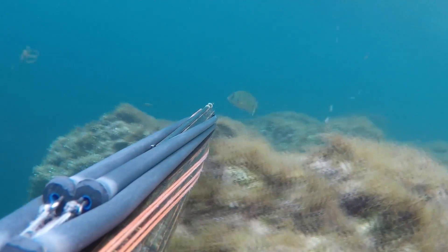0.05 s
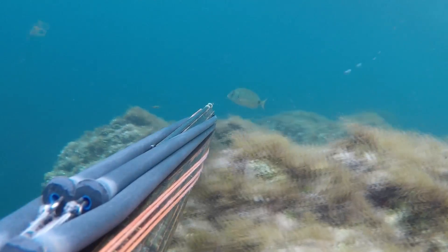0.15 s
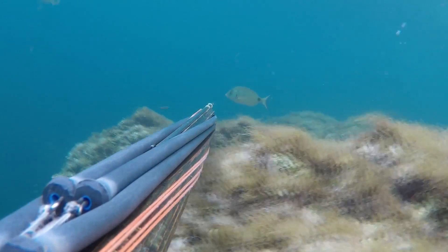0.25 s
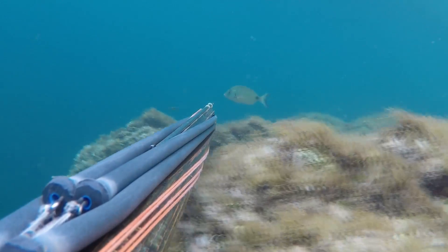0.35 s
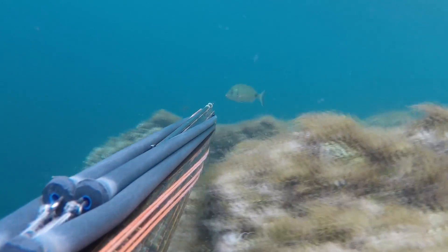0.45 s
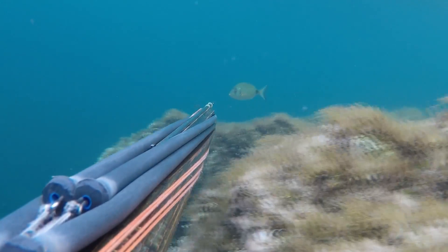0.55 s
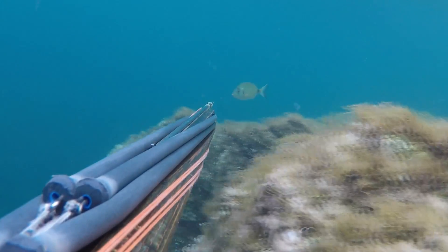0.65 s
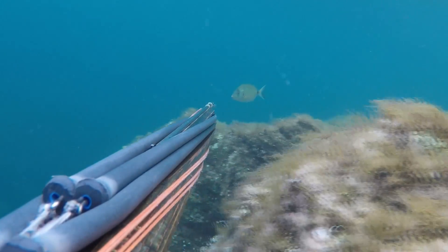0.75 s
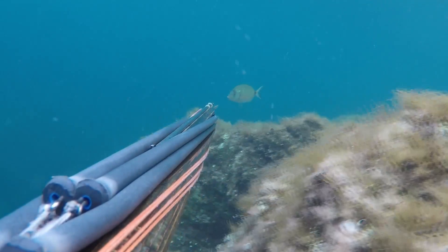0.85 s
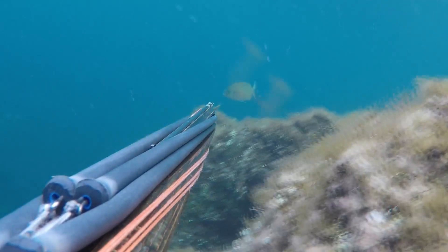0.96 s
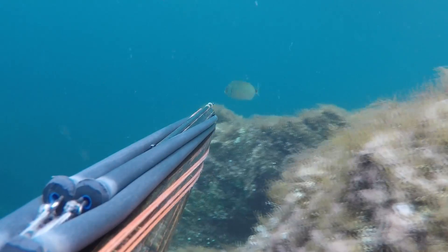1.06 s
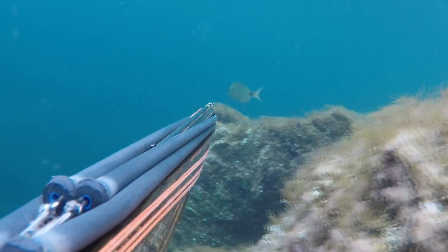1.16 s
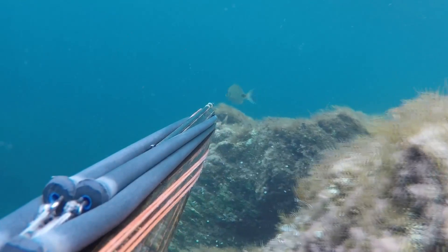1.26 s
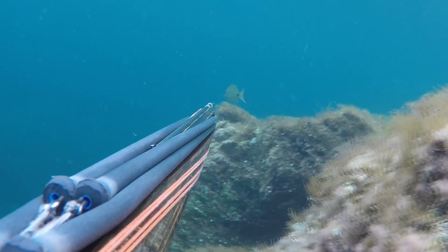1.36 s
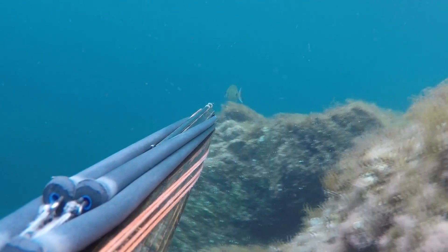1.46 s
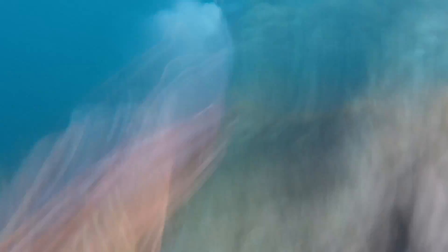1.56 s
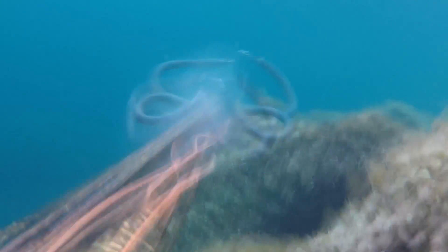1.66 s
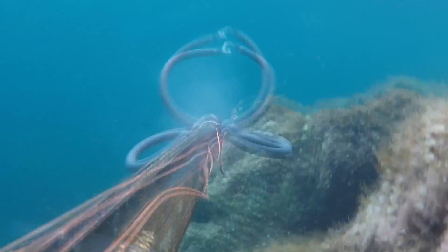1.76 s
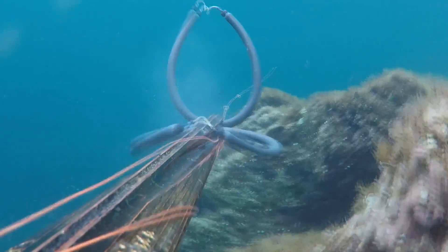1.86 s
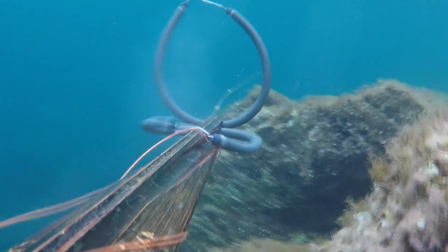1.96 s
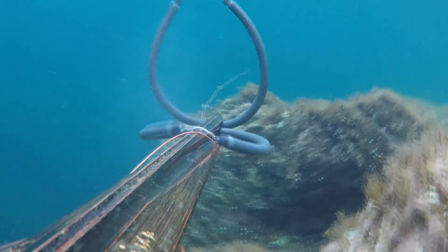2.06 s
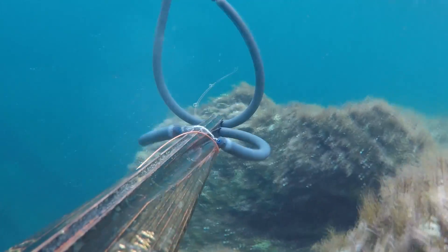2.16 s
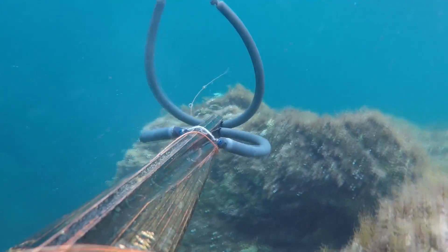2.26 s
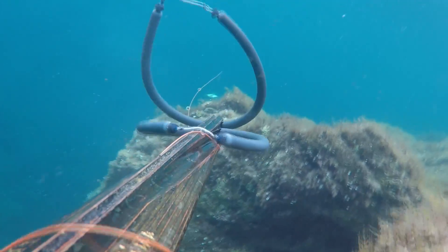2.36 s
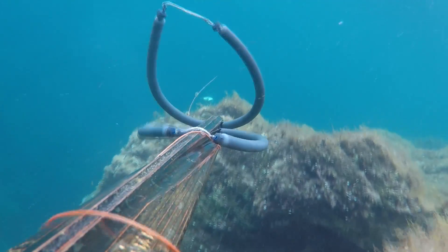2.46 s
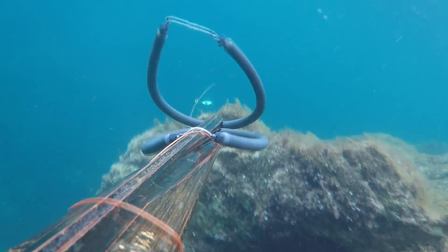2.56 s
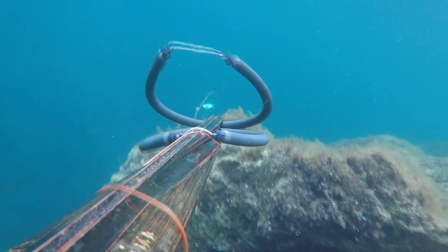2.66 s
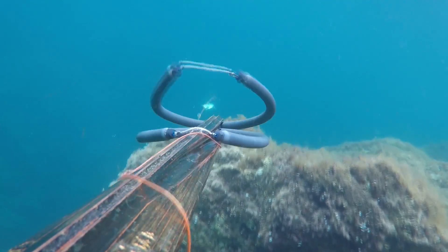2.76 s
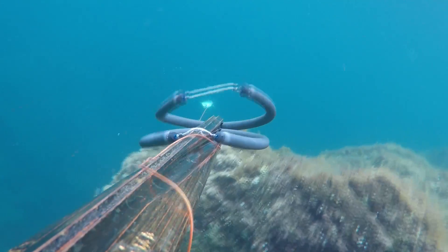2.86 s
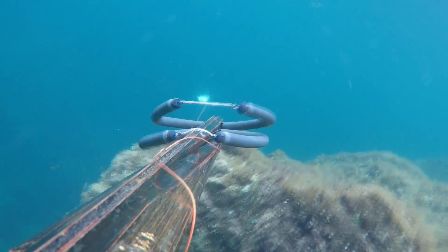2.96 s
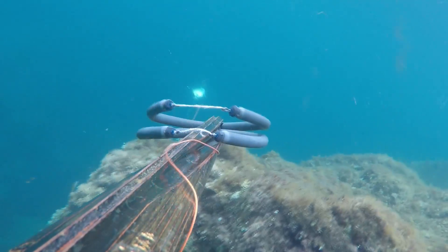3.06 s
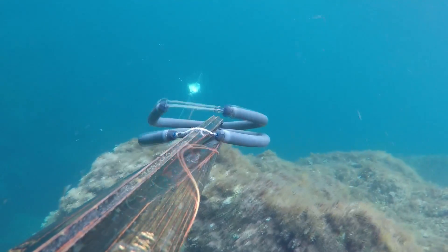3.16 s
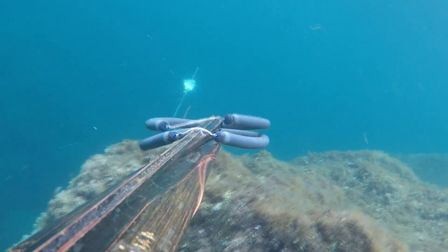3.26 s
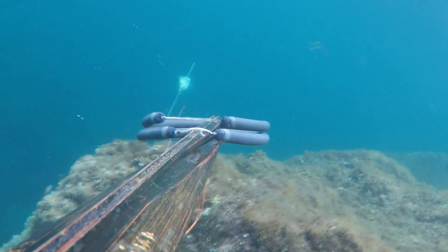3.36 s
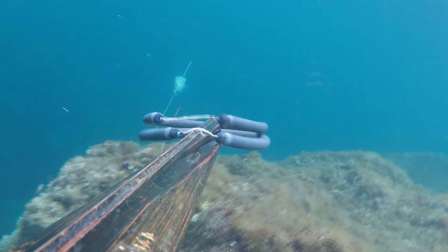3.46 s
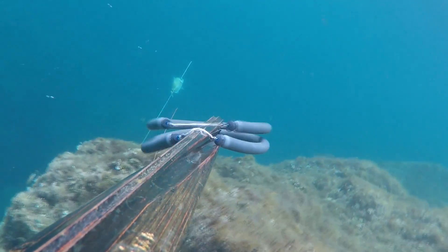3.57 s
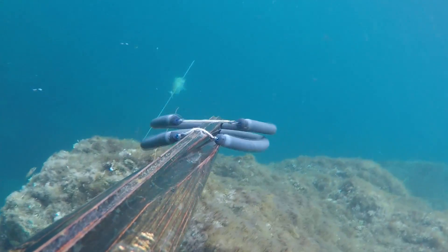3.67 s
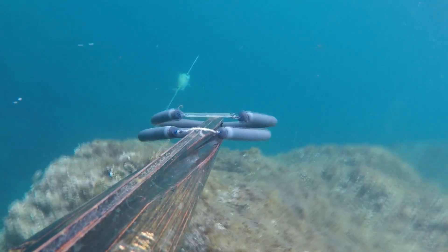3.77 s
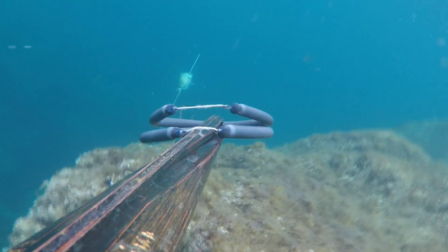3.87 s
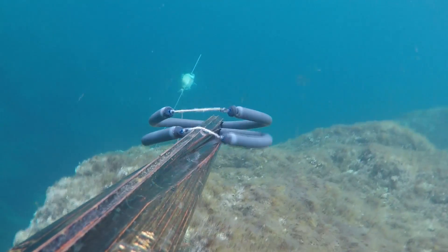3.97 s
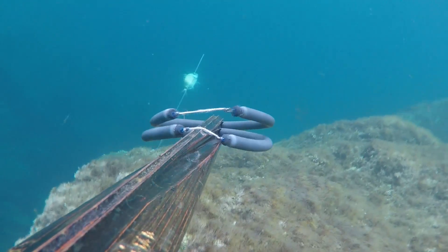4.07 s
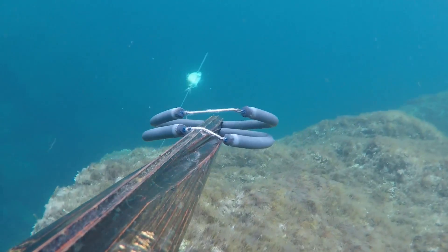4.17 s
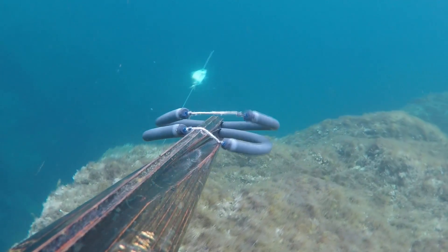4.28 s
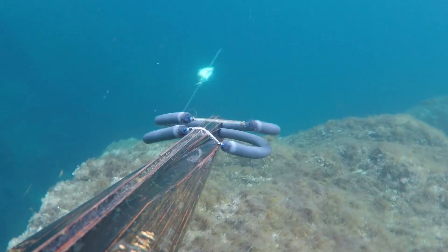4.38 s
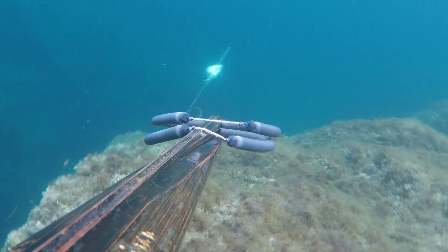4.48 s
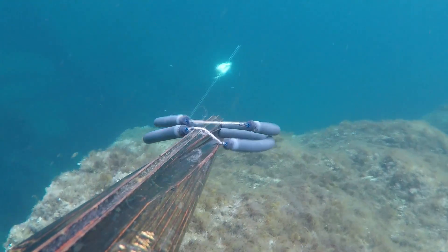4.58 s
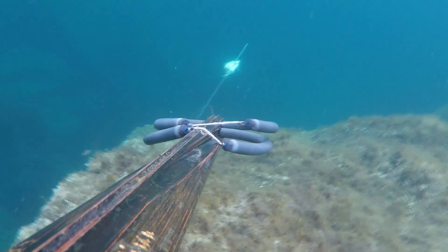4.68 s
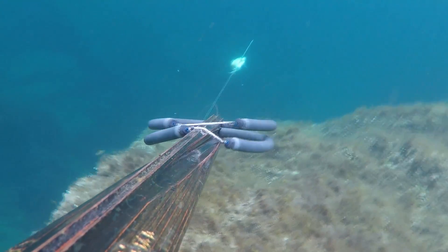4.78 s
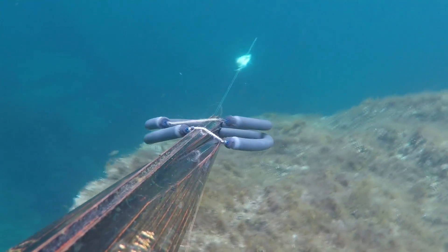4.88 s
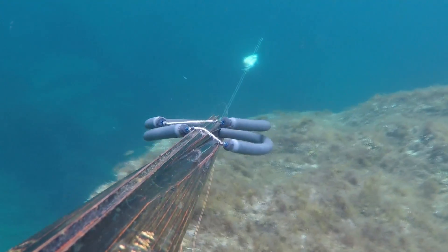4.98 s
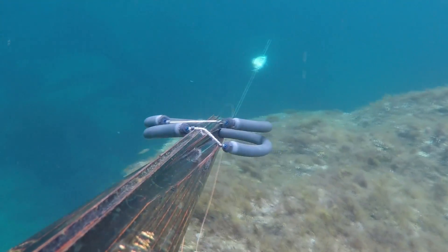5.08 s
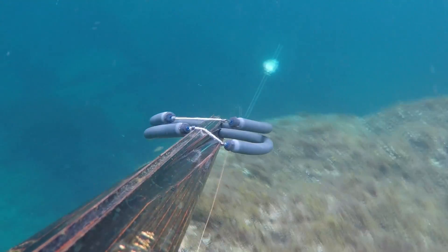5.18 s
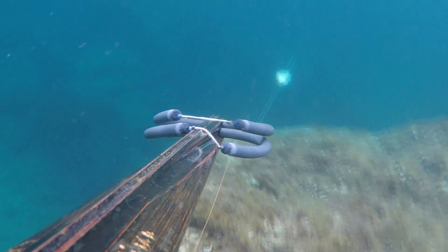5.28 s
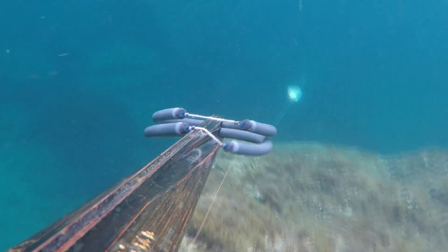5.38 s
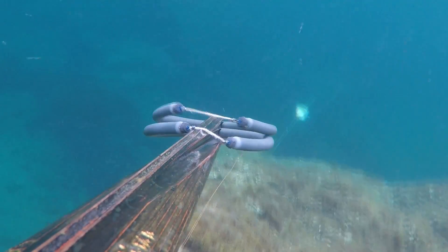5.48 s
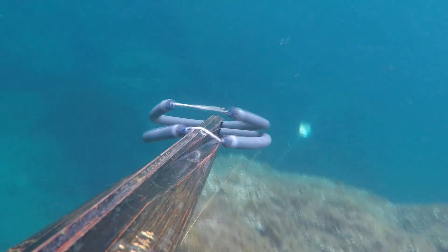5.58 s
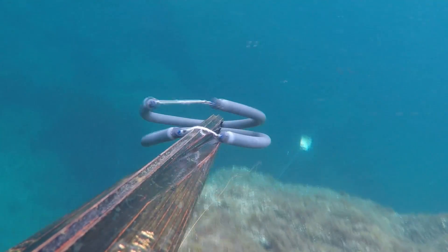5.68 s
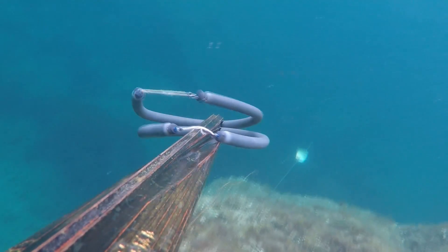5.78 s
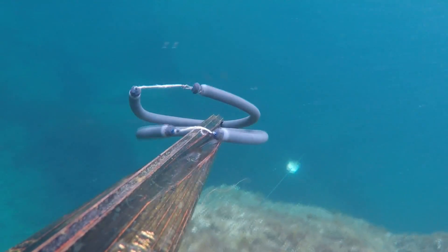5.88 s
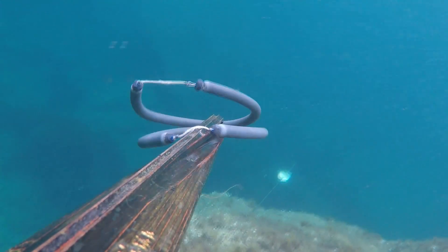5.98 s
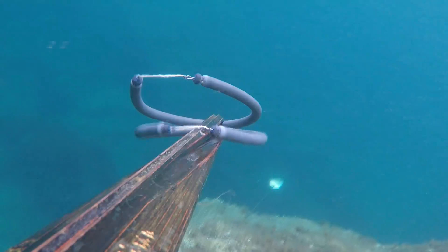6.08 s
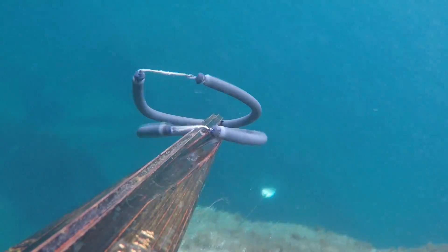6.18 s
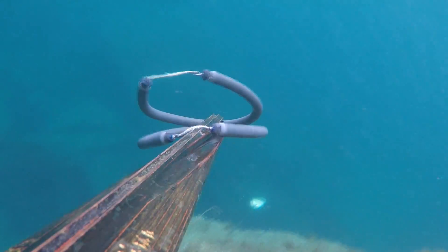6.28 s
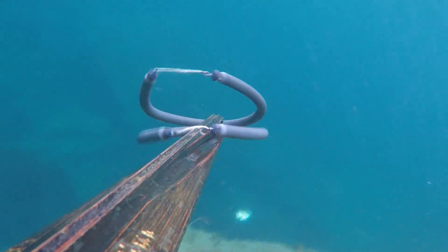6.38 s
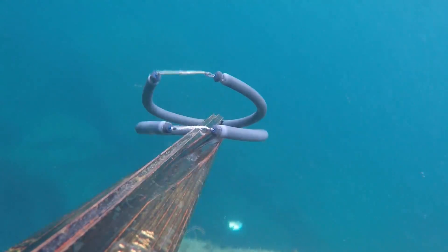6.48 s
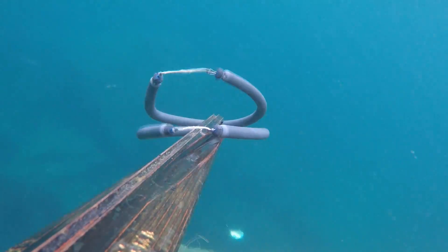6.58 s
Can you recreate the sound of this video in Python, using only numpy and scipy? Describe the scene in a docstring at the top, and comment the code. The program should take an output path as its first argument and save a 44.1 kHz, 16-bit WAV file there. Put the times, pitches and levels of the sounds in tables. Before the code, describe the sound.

Underwater rumble and faint ticking are broken by one loud speargun shot, then a brief lull, gear knocks and a few small bubbles.

```python
"""A speargun fires under water, heard by a camera in a housing fixed to the gun.
Water sways the housing, rumbles, gurgles and hisses, with reef snaps, treble chatter and ticks.
At 1.62 s bands, line and air tear through the water; the shot rocks the housing, rings the gun
and overloads the microphone. The background falls quiet and slowly returns by 3.8 s.
Gear knocks on the housing, a few bubbles detach, and small ones freed by the gear fizz."""
import sys
import numpy as np
from scipy import signal
from scipy.io import wavfile
from scipy.ndimage import uniform_filter1d

SR = 44100
rng = np.random.default_rng(int(sys.argv[2]) if len(sys.argv) > 2 else 0)


def put_to_file(sound):
    """Save the sound as 16-bit audio at rate SR, in the file named by the first command-line argument."""
    columns = np.atleast_2d(sound).T  # one column per channel
    safe = np.clip(columns, -1, 1)
    whole_steps = np.round(safe * 32767)
    wavfile.write(sys.argv[1], SR, whole_steps.astype(np.int16))


N = 292383


def gain(db):
    return 10 ** (np.asarray(db) / 20)


def unit_rms(x):
    return x / np.sqrt(np.mean(x ** 2) + 1e-20)


def curve(rows, column=1):
    """One column of a time table, at every sample."""
    rows = np.asarray(rows)
    return np.interp(np.arange(N) / SR, rows[:, 0], rows[:, column])


def add(mix, start_s, sound):
    part = mix[round(start_s * SR):][:len(sound)]
    part += sound[:len(part)]


def resonate(x, hz, width_hz, stages=1):
    """Two-pole resonances in series."""
    r = np.exp(-np.pi * width_hz / SR)
    for _ in range(stages):
        x = signal.lfilter([1 - r, 0, r - 1], [1, -2 * r * np.cos(2 * np.pi * hz / SR), r * r], x)
    return x


def drift(span_samples, length=N, passes=1):
    """Smoothed random motion, rms 1."""
    x = rng.standard_normal(length)
    for _ in range(passes):
        x = uniform_filter1d(x, span_samples)
    return unit_rms(x)


def noise(spectrum, fft_size, patchy_db, source=None):
    """Noise of rms 1 with the given spectrum and drifting patches."""
    x = rng.standard_normal(N) if source is None else source
    bin_hz, _, frames = signal.stft(x, SR, nperseg=fft_size)
    hz, db = np.transpose(spectrum)
    colour_db = np.interp(np.log(bin_hz + 1), np.log(hz + 1), db, left=-90, right=-90)
    patches = uniform_filter1d(rng.standard_normal(frames.shape), size=6, axis=0)
    patches = unit_rms(uniform_filter1d(patches, size=4, axis=1))
    frames *= gain(colour_db[:, None] + patchy_db * patches)
    return unit_rms(signal.istft(frames, nperseg=fft_size)[1][:N])


def ring(hz, t60_s, rise_cycles):
    """A sine that swells, then dies."""
    t = np.arange(round(t60_s * SR)) / SR
    attack = 1 - np.exp(-(t * hz / rise_cycles) ** 2)
    return np.sin(2 * np.pi * hz * t) * gain(-60 * t / t60_s) * attack


def lull(depth_db):
    """Background gain: sinks after the shot, holds, slowly returns."""
    return gain(curve([(1.66, 0), (1.88, depth_db), (2.68, depth_db), (3.8, 0)]))


# Water pressure on the housing: time_s, level_db
SWAY_LEVELS = [(0, -37.5), (.16, -19), (.38, -31), (.66, -29), (.78, -17.5), (.92, -25.5), (1.16, -27.5),
               (1.26, -21), (1.36, -34.5), (1.54, -25.5), (1.8, -30), (2.34, -36.5), (2.58, -23.5),
               (2.84, -30.5), (2.94, -27), (3.3, -37), (3.5, -29), (3.76, -38), (3.88, -22.5), (4.1, -31.5),
               (4.4, -39), (4.7, -29), (4.86, -40), (5.46, -31.5), (5.8, -38.5), (5.94, -29), (6.1, -36),
               (6.63, -38.5)]


def sway():
    """Water presses on the housing: a wandering low tone with buffeting."""
    pitch_hz = 24 * np.exp(0.19 * drift(2000, passes=2))
    lumps_db = 2 * drift(2000, passes=2)
    tone = np.sqrt(2) * np.sin(2 * np.pi * np.cumsum(pitch_hz) / SR)
    buffeting = noise([(20, -11.5), (35, -1), (60, -19.5), (90, -29.5)], fft_size=4096, patchy_db=1)
    return gain(curve(SWAY_LEVELS) + lumps_db) * lull(-21.5) * (tone + gain(-11) * buffeting)


# Flow round the housing: time_s, rumble_db, gurgle_db
FLOW_LEVELS = [(0, -58, -41), (.2, -49, -47), (1.32, -54, -51), (1.9, -52, -49.5), (2.5, -44.5, -42),
               (3.05, -39, -38.5), (3.36, -48.5, -45), (3.5, -43.5, -43), (3.8, -45, -42.5),
               (4.4, -53, -51), (4.6, -42, -44), (4.8, -53.5, -50), (5.2, -49, -48.5), (5.48, -35.5, -48.5),
               (5.9, -44.5, -49.5), (6.16, -51, -55), (6.52, -38, -45.5)]
# Flow spectra: freq_hz, density_db
RUMBLE_SPECTRUM = [(32, -33.5), (55, -6.5), (97, -14.5), (151, -16.5), (230, -20), (300, -51), (510, -120)]
GURGLE_SPECTRUM = [(120, -30.5), (180, -11), (250, -5), (345, 2), (430, -7.5), (560, -17), (800, -39.5)]
SHOT_S, WAKE_FALL_DB_PER_S = 1.62, 129


def flow():
    """Water rumbles and gurgles round the housing, churned by the shot; later the gurgle deepens."""
    since_s = np.arange(N) / SR - SHOT_S
    wake = (since_s > 0) * gain(-WAKE_FALL_DB_PER_S * abs(since_s))
    rumble = noise(RUMBLE_SPECTRUM, fft_size=4096, patchy_db=1.5)
    rumble *= gain(curve(FLOW_LEVELS)) * lull(-29) + gain(-24.5) * wake
    early = noise(GURGLE_SPECTRUM, fft_size=2048, patchy_db=3.5)
    deeper = noise([(0.85 * hz, db) for hz, db in GURGLE_SPECTRUM], fft_size=2048, patchy_db=3.5)
    fade_rad = np.pi / 2 * curve([(3.65, 0), (4.62, 1)])
    gurgle = np.cos(fade_rad) * early + np.sin(fade_rad) * deeper
    gurgle *= gain(curve(FLOW_LEVELS, column=2)) * lull(-28.5) + gain(-29.5) * wake
    return rumble + gurgle


# Water hiss: freq_hz, density_db
HISS_SPECTRUM = [(400, -27.5), (600, -1.5), (900, -9), (1050, -2.5), (1200, -7.5), (1550, -3), (1950, -12),
                 (2350, -7.5), (3200, -12), (4800, -12.5), (5150, -9), (5600, -14.5), (7600, -18.5),
                 (14600, -22.5), (15500, -34)]


def hiss():
    """Broad water hiss; swells once in the lull and drops back."""
    swell_db = curve([(2.06, 0), (2.255, 8.5), (2.269, 0)])
    return gain(-62.5 + swell_db) * lull(-15.5) * noise(HISS_SPECTRUM, fft_size=512, patchy_db=.3)


# Far shrimp snaps: freq_hz, density_db
SNAP_SPECTRUM = [(1500, -29.5), (3000, -3), (5800, -2), (9000, -6.5), (15000, -24)]


def shrimp(snaps_per_s=90):
    """Shrimp snap on the reef: sparse treble impulses, a few much larger."""
    onsets = rng.random(N) < snaps_per_s / SR
    size_db = 4 * np.minimum(rng.exponential(1, N), 3)
    impulses = onsets * gain(size_db) * rng.choice([-1, 1], N)
    return gain(-72) * lull(-12) * noise(SNAP_SPECTRUM, fft_size=256, patchy_db=8, source=impulses)


# Treble chatter: centre_hz, width_hz, level_db
TREBLE_BANDS = [(11600, 1800, 0), (14100, 1300, -8), (8800, 1200, -14)]


def chatter(period_s=.1386, jitter_s=.015, burst_s=.053):
    """Thin, grainy treble in short bursts at a nearly steady pace."""
    gate, burst = np.zeros(N), signal.windows.tukey(round(burst_s * SR), .3)
    for start_s in np.arange(.012, N / SR, period_s):
        late, size = rng.standard_normal(2)
        add(gate, max(start_s + jitter_s * late, 0), gain(1.4 * size) * burst)
    grains = unit_rms(gain(5.5 * drift(150)) * rng.standard_normal(N))
    bands = sum(gain(db) * resonate(grains, hz, width_hz, stages=2) for hz, width_hz, db in TREBLE_BANDS)
    return gain(-68) * lull(-23) * gate * unit_rms(bands)


# Snaps and gear ticks: start_s, bright_peak_db, pitch_hz, body_peak_db
TICK_HITS = [(0.0273, -43, 5900, -64), (0.163, -46, 2660, -44), (0.336, -43.5, 2700, -52),
             (0.5057, -38, 5630, -70), (0.5543, -35.5, 5100, -60), (1.199, -39, 4930, -64),
             (1.2121, -29.5, 5140, -35.5), (1.591, -51.5, 2201, -49), (1.7245, -48, 2710, -33),
             (1.7496, -34.5, 3560, -52), (1.8074, -50.5, 3700, -41), (1.8144, -57, 3780, -33.5),
             (2.003, -55, 3870, -49.5), (2.0161, -59, 2610, -56), (2.0474, -64, 4020, -55),
             (2.589, -40, 2930, -38), (2.602, -51, 3770, -48), (2.6314, -58, 4920, -56),
             (2.6848, -53, 4510, -56), (2.9123, -52.5, 5500, -63.5), (2.925, -46.5, 4500, -58),
             (2.961, -35, 3100, -39), (2.9771, -35.5, 2930, -35.5), (3.0753, -34, 2900, -34),
             (3.085, -42.5, 2860, -38), (3.1525, -50, 5200, -53), (3.214, -52, 3570, -53),
             (3.298, -45.5, 3700, -63), (3.4099, -44, 5760, -50.5), (3.5425, -41.5, 4120, -43),
             (3.5795, -46.5, 2700, -48), (3.6164, -38, 2830, -36.5), (3.6271, -32.5, 3500, -32),
             (3.78, -39, 2920, -32.5), (3.785, -50, 2810, -36), (3.79, -44, 3230, -31),
             (3.7946, -42.5, 3120, -28), (3.8035, -34.5, 2670, -28), (3.8133, -31.5, 4280, -35.5),
             (3.9794, -45.5, 5750, -50), (4.229, -42, 3740, -44.5), (4.271, -48.5, 2900, -42),
             (4.3491, -38, 3550, -41.5), (4.5812, -42.5, 5240, -58), (5.0469, -37.5, 2640, -40.5),
             (5.4993, -39, 5500, -40.5), (5.5109, -35, 4970, -49), (5.8596, -41, 5630, -59),
             (5.9254, -44, 2580, -60), (6.112, -42.5, 5700, -58), (6.408, -35, 4730, -70),
             (6.482, -32.5, 5160, -41.5)]


def ticks():
    """Short cracks excite a bright resonance, its overtone and the low body of the housing."""
    out, t = np.zeros(N), np.arange(1500) / SR
    crack, tail = gain(-60 * t / 0.0059), gain(-18 - 60 * t / 0.038)
    attack = 1 - np.exp(-t / 0.00039)
    for start_s, bright_db, hz, body_db in TICK_HITS:
        hit = rng.standard_normal(len(t)) * (crack + tail) * attack
        bright = resonate(resonate(hit, hz, .5 * hz), hz, 0.43 * hz) + gain(-23) * hit
        bright += gain(-11.5) * resonate(hit, 1.53 * hz, .5 * hz, stages=2)
        body = resonate(resonate(hit, 610, 1050), 1200, 1320)
        add(out, start_s, gain(bright_db) * bright / abs(bright).max())
        add(out, start_s, gain(body_db) * body / abs(body).max())
    return out


# Crack, rush, then the bands whipping back: peak_s, level_db, rise_s, fall_db_per_s
RUSH_PULSES = [(1.6168, -1, 0.0031, 2600), (1.628, -15.5, 0.0093, 1200), (1.636, -17.5, 0.011, 700),
               (1.651, -18, 0.015, 600), (1.678, -26.5, 0.034, 800), (1.738, -31.5, 0.034, 750),
               (1.781, -53, 0.02, 695), (1.81, -54, .03, 700), (1.848, -59, 0.027, 700),
               (1.889, -60.5, 0.023, 900)]
# Torn water: freq_hz, density_db
RUSH_SPECTRUM = [(250, -29.5), (400, -5), (700, -16), (1100, -10), (1500, -8.5), (2300, -13.5), (4000, -22),
                 (6000, -27.5), (8000, -37.5), (15500, -49)]


def rush(rise_db=34):
    """Bands, line and air tear through the water: grainy bursts, duller as they weaken."""
    t = np.arange(N) / SR
    bursts_db = [db - np.where(t < peak_s, rise_db * (peak_s - t) / rise_s, fall * (t - peak_s))
                 for peak_s, db, rise_s, fall in RUSH_PULSES]
    level_db = np.max(bursts_db, axis=0)
    bright = unit_rms(gain(4.2 * drift(90)) * noise(RUSH_SPECTRUM, fft_size=512, patchy_db=1.5))
    dull = unit_rms(resonate(bright, 1500, 2300))
    brightness = np.clip((level_db + 53.5) / 25, 0, 1)
    return gain(level_db) * (brightness * bright + (1 - brightness) * dull)


# Blows on the gun: start_s, level_db, pitch_hz, t60_s
GUN_RINGS = [(1.6185, 15.5, 56, 0.042), (1.628, -15, 380, 0.14), (1.6435, -11.5, 1600, 0.044),
             (1.6465, -2, 270, 0.022), (1.6335, -13, 240, 0.17), (1.627, -14.5, 2000, 0.011),
             (1.63, -10, 146, 0.063), (1.64, -21.5, 1200, .03), (1.7375, -27, 2260, 0.011)]


def recoil(rocking_hz=22):
    """The shot rocks the housing and rings the gun."""
    out, t = np.zeros(N), np.arange(SR // 4) / SR
    rocking = -np.sin(2 * np.pi * rocking_hz * t) * gain(-2.5 - 29 * t - 2400 * t * t)
    add(out, 1.6245, rocking)
    for start_s, db, hz, t60_s in GUN_RINGS:
        add(out, start_s, gain(db) * ring(hz, t60_s, rise_cycles=0.091))
    return out


# Gear striking the housing: start_s, level_db, pitch_hz, t60_s
GEAR_KNOCKS = [(3.7137, -18, 410, 0.015), (3.72, -26, 322, 0.077), (4.126, -31, 255.7, 0.16),
               (4.258, -9.5, 270, 0.019), (4.26, -5, 100, 0.023), (4.61, -26, 239, 0.072),
               (5.057, -29.5, 119.6, 0.086), (5.42, -16.5, 139.3, 0.073), (5.438, -23.5, 207, 0.088),
               (5.625, -30.5, 180, 0.11), (5.676, -24.5, 181, 0.088), (5.756, -27.5, 210, 0.043),
               (5.913, -21, 130.4, 0.067), (6.454, -21, 292, 0.044), (6.472, -15.5, 216, 0.041),
               (6.503, -24, 365, 0.044), (6.531, -25, 352, 0.059), (6.558, -33, 321, 0.039),
               (6.583, -6, 122, 0.038), (6.584, -15, 307, 0.041), (6.593, -8, 122, 0.03)]


def knocks(faint_from_s=3.5, faint_per_s=5):
    """Gear knocks ring low and short; fainter ones scatter once the gun is moved."""
    out, span_s = np.zeros(N), N / SR - faint_from_s
    for start_s, db, hz, t60_s in GEAR_KNOCKS:
        add(out, start_s, gain(db) * ring(hz, t60_s, rise_cycles=0.0017 * hz))
    for when, softness, pitch in rng.random((round(faint_per_s * span_s), 3)):
        hz = 200 + 125 * pitch
        knock = ring(hz, t60_s=0.074, rise_cycles=0.002 * hz)
        add(out, faint_from_s + when * span_s, gain(-33 - 5 * softness) * knock)
    return out


# Single bubbles: start_s, peak_db, pitch_hz, end_pitch_ratio, length_s
BUBBLE_NOTES = [(4.517, -38, 1700, 1.07, 0.0055), (5.129, -49.5, 2220, 0.85, 0.0061),
                (5.156, -48.5, 1840, 1.02, 0.0074), (5.252, -44, 1670, 2.1, 0.0075),
                (5.323, -51, 741, 1.5, 0.041), (5.368, -47.5, 750, 1.7, 0.05),
                (5.821, -44, 540, 1.36, 0.028), (5.319, -51, 1435, 0.97, .026),
                (5.818, -54, 810, 1.2, 0.023), (6.173, -51.5, 1080, 1.23, .02),
                (6.232, -58.5, 998, 1.35, 0.04)]


def bubbles():
    """Bubbles ring as shivering sines; most rise in pitch as they detach."""
    out = np.zeros(N)
    for start_s, db, hz, end_ratio, length_s in BUBBLE_NOTES:
        age = np.linspace(0, 1, round(length_s * SR))
        pitch_hz = hz * end_ratio ** (age * age) * (1 + .04 * drift(80, len(age)))
        envelope = np.sin(np.pi * age ** 0.46)
        add(out, start_s, gain(db) * envelope * np.sin(2 * np.pi * np.cumsum(pitch_hz) / SR))
    return out


# Small bubbles freed by moving gear: time_s, level_db
FIZZ_LEVELS = [(5.2, -78), (5.33, -55), (5.5, -64), (5.8, -68.5), (5.83, -50.5), (5.87, -78), (6.63, -69.5)]


def fizz():
    """Many small bubbles, each a few rising cycles."""
    out, age = np.zeros(N), np.linspace(0, 1, 500)
    for hz in np.geomspace(700, 1900, num=14):
        phase = 2 * np.pi * np.cumsum(hz * (1 + 0.19 * age)) / SR
        bubble = np.sin(np.pi * age ** 0.67) * np.sin(phase)
        releases = (rng.random(N) < 50 / SR) * rng.standard_normal(N)
        out += signal.oaconvolve(releases, bubble)[:N]
    started = np.arange(N) > FIZZ_LEVELS[0][0] * SR
    return gain(curve(FIZZ_LEVELS)) * started * unit_rms(out)


def scene():
    """All sources at one microphone."""
    background = sway() + flow() + hiss() + shrimp() + chatter()
    return (background + ticks() + rush() + recoil() + knocks() + bubbles() + fizz())[None]


def record(dry):
    """The input overloads, then is band-limited to 15.6 kHz."""
    clipped = np.clip(dry, -.97, .97)
    lowpass = signal.firwin(301, 15600, window=("kaiser", 8), fs=SR)
    return signal.oaconvolve(clipped, lowpass[None], "same")


dry = scene()
out = record(dry)
put_to_file(out)
```